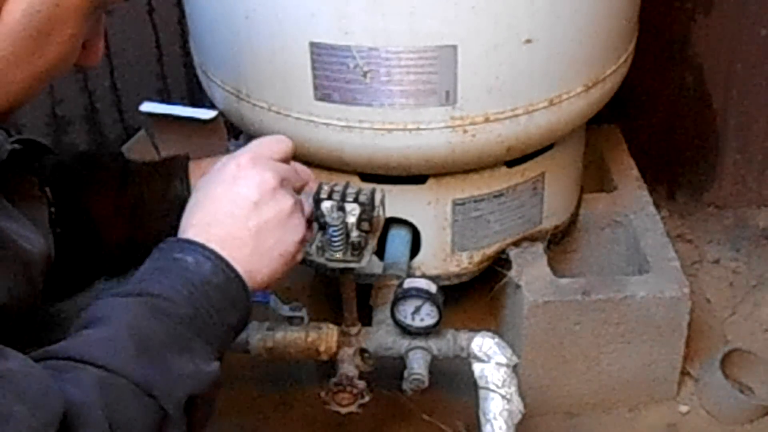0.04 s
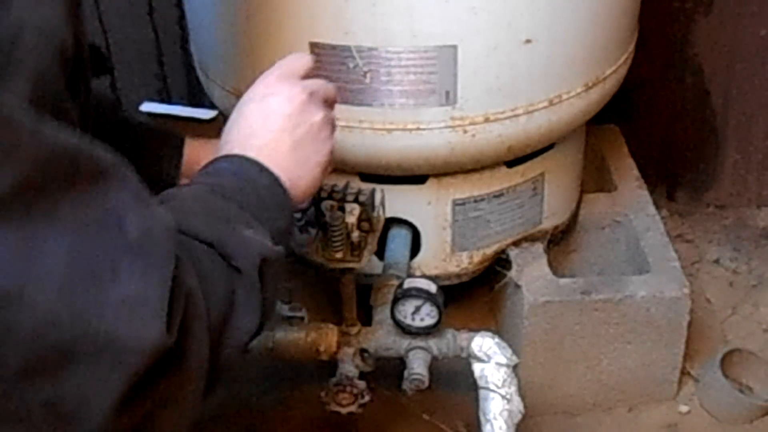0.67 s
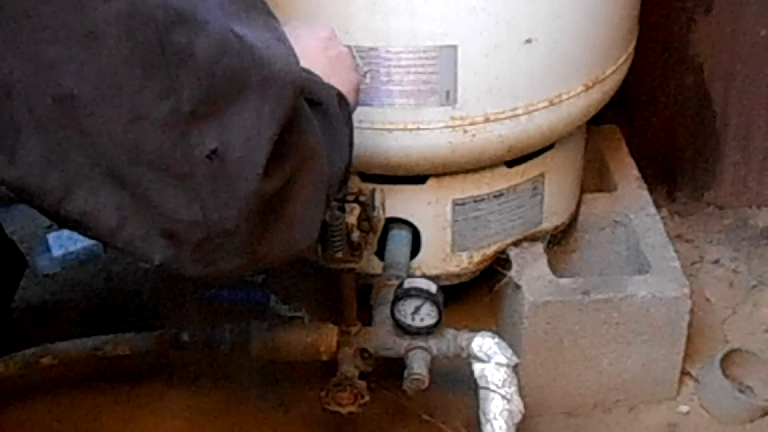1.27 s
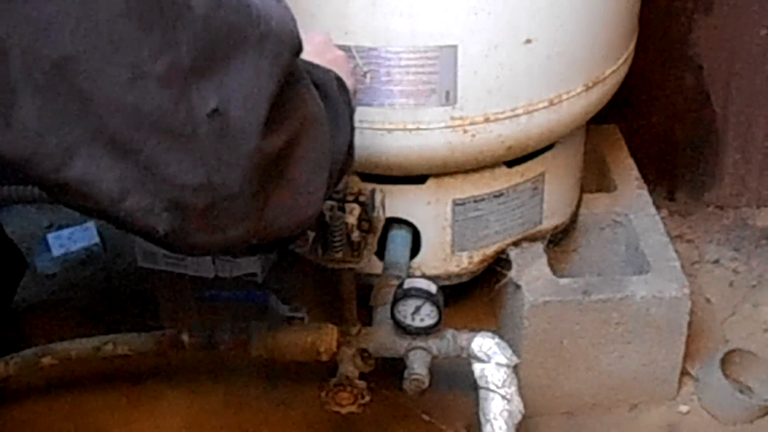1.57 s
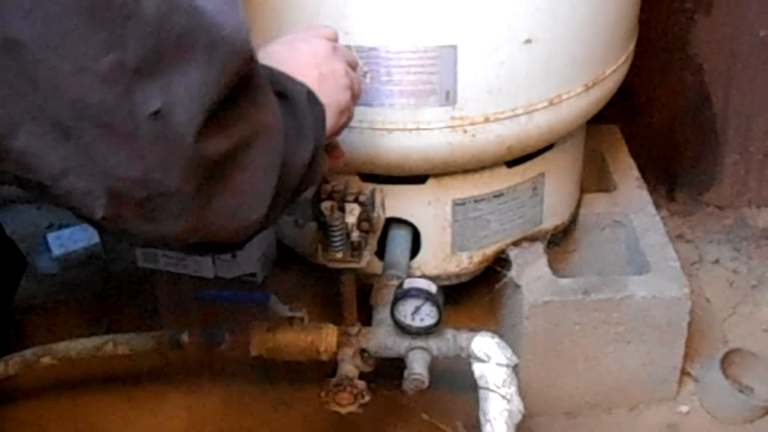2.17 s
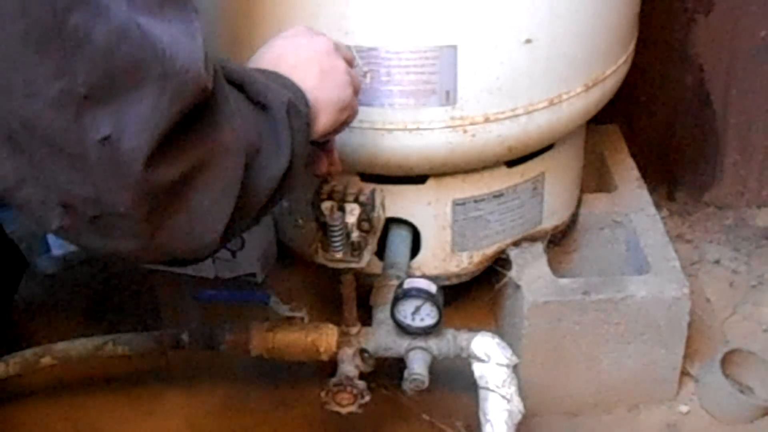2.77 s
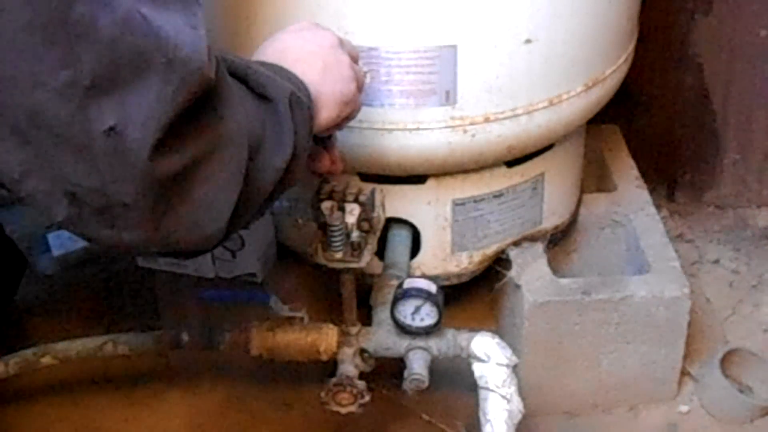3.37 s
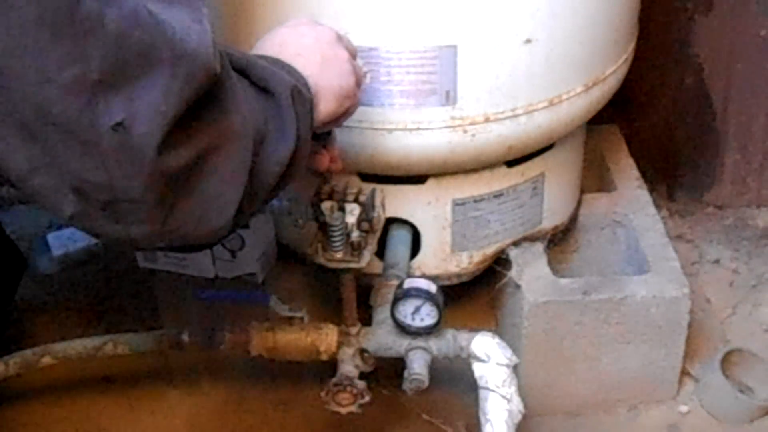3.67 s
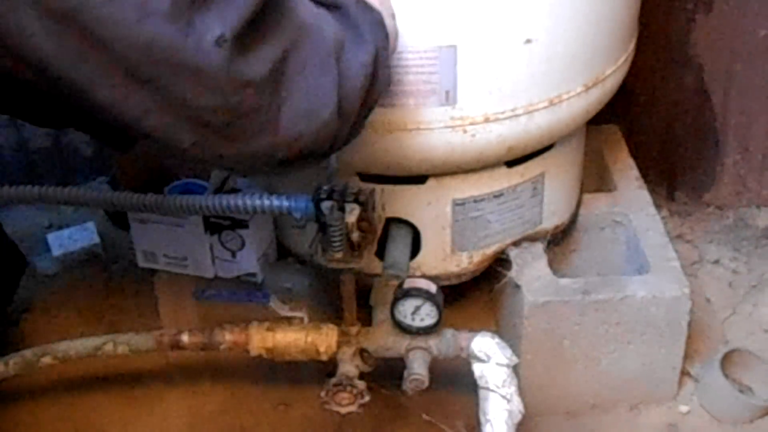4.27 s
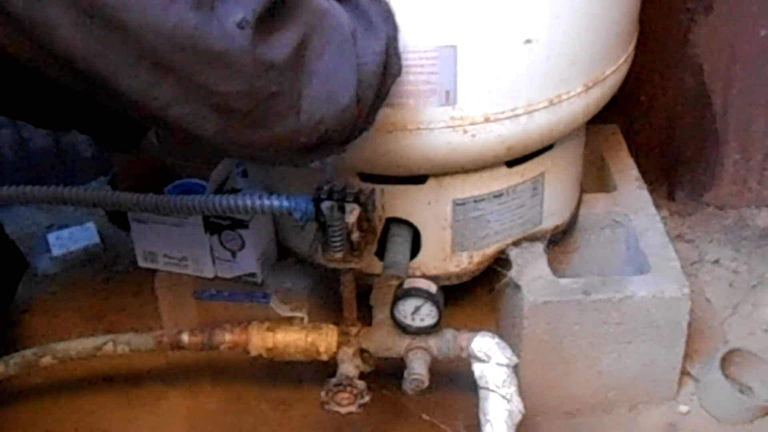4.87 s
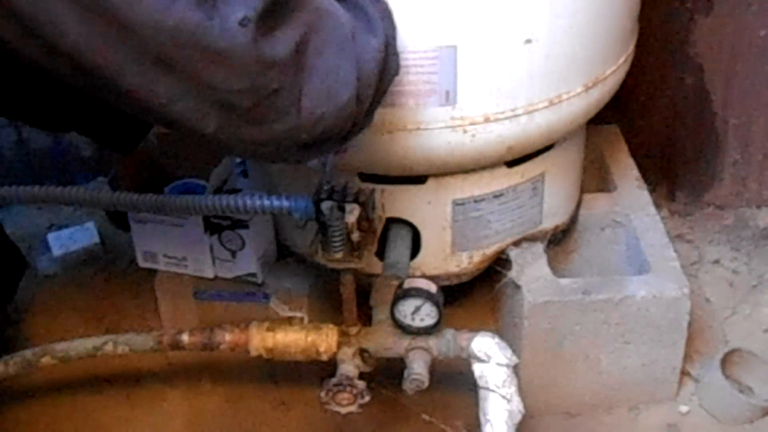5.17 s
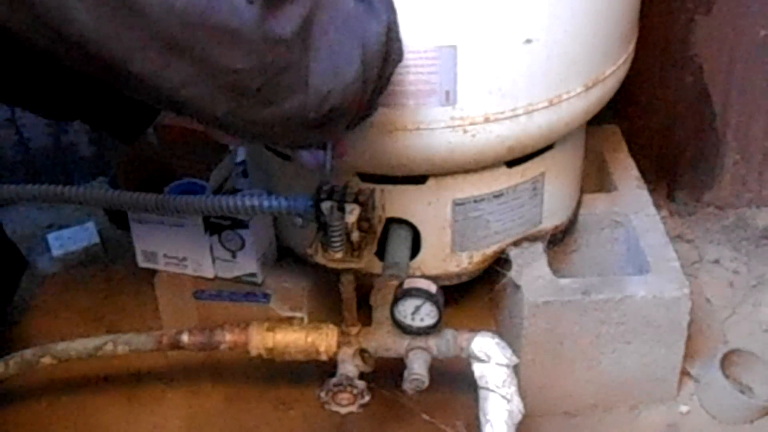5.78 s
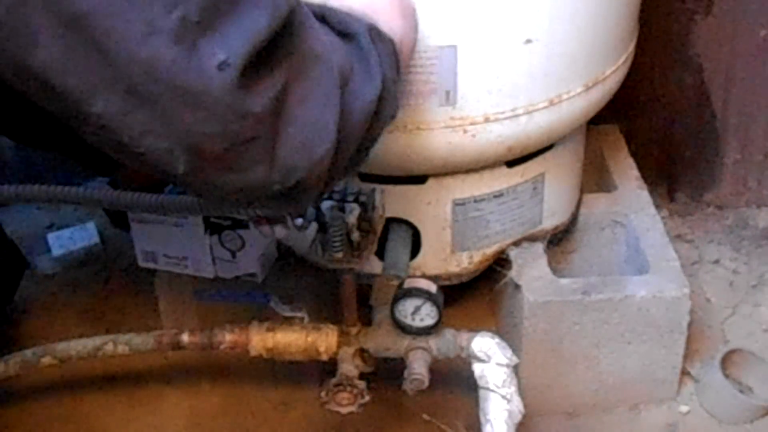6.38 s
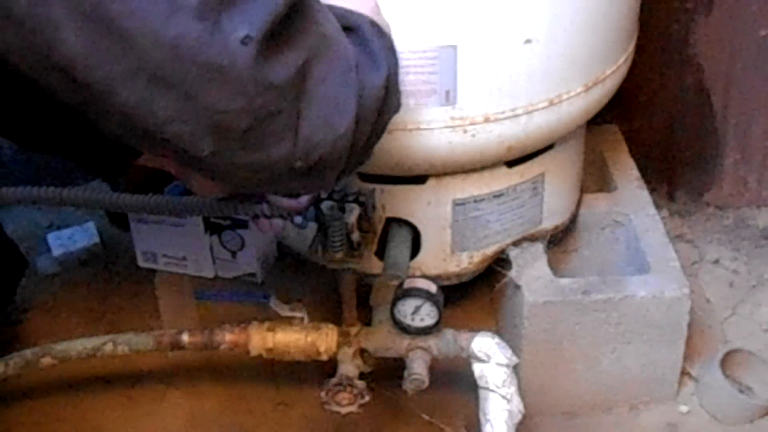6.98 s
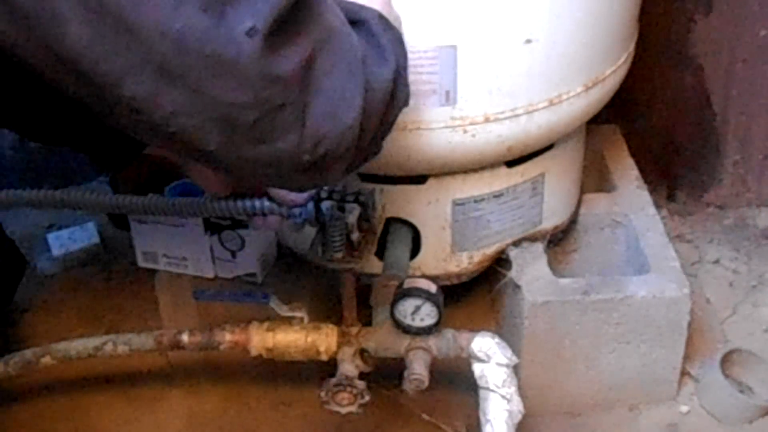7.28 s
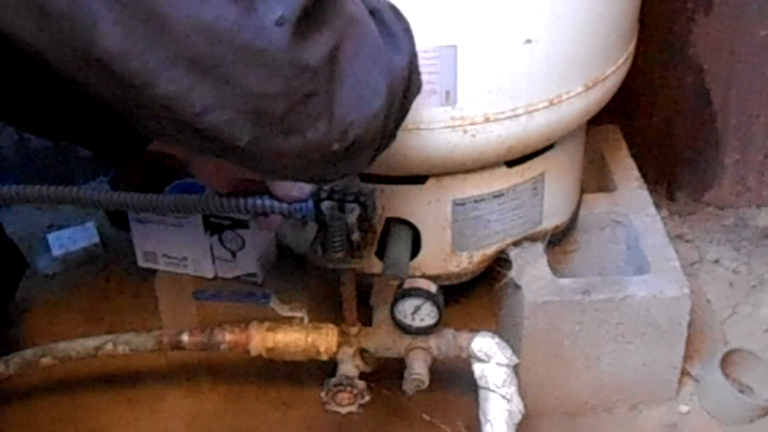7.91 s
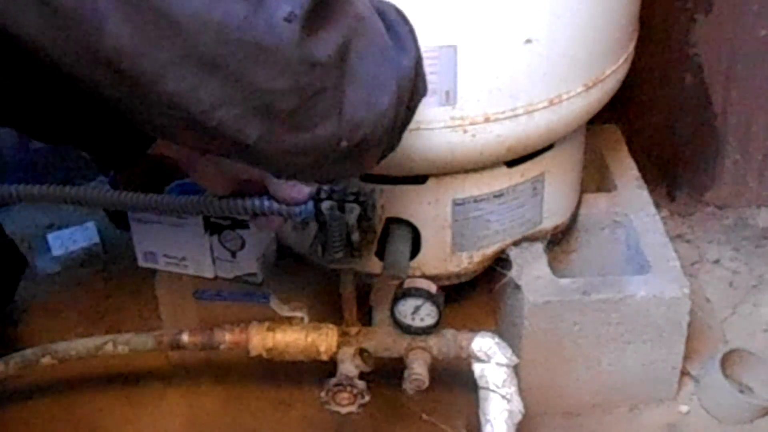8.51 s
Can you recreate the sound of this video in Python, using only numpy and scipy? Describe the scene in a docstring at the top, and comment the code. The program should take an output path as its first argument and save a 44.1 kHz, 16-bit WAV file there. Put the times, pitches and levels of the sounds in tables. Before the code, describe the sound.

A screwdriver and a stiff wire click and scrape in the switch of a well pump. Scattered taps give way to a quieter stretch of faint scraping, then a busier run of knocks and sharp metal clicks, some twanging a spring or booming faintly in the tank. A jacket sleeve rubs and swishes close to the microphone, over a faint hiss and low rumble in a small, hard-walled room.

```python
"""A screwdriver and a stiff wire click and scrape in the pressure switch of a well pump.
Each slip of the tool cracks and rings the steel, knocks the switch on its pipe and booms in the
pressure tank; some twang the switch spring. A small hard-walled room answers every hit.
A jacket sleeve rubs and swishes close to the microphone, over a faint hiss and a deep rumble."""
import sys
import numpy as np
from scipy import signal
from scipy.fft import rfft, irfft, next_fast_len
from scipy.io import wavfile

SR = 44100
rng = np.random.default_rng(int(sys.argv[2]) if len(sys.argv) > 2 else 0)


def materialize(psi):
    """Save the field psi as 16-bit PCM at rate SR to the path in sys.argv[1].

    A 1-D psi becomes a single channel; in a 2-D psi each row is a channel.
    """
    bounded = np.clip(np.atleast_2d(psi).T, -1, 1)
    quanta = np.round(bounded * 32767).astype(np.int16)
    wavfile.write(sys.argv[1], SR, quanta)


N = 381465
T = np.arange(2 * SR) / SR  # seconds since a hit
CLOCK = np.arange(N) / SR

# The tip clicks on the switch. Each row: start in seconds, force in dB, heft into the switch body in dB,
# bright edge in dB, blade ring in dB, contact time in seconds.
TAPS = [(0.2848, -25.5, 7, 6.5, -51, 0.0023), (0.3196, -30.5, 6, 18.5, -30.5, .0012),
        (0.4082, -43.5, 4, 20.5, -60, 0.0051), (0.475, -29.5, 8, -11, -48, 0.0058),
        (0.8638, -17, 8, -8, -50, 0.0035), (0.951, -19, 7.5, -5.5, -41, 0.0056),
        (0.997, -19.5, 9, -4.5, -48, 0.0059), (1.205, -28, 13.5, -12, -41, 0.0027),
        (1.357, -10.5, 8.5, 1.5, -29, 0.006), (1.6402, -20.5, -1.5, 3.5, -36.5, 0.0024),
        (4.2615, -16.5, 11, -7.5, -42, 0.0044), (4.4899, -26, 11.5, 1, -59, .005),
        (4.616, -32, 1, -7, -60, 0.0035), (4.926, -17.5, 6.5, 0, -47, 0.0034),
        (5.1542, -21.5, 5.5, -5.5, -54, 0.0023), (5.6601, -12, 12, 0, -32, .005),
        (5.805, -9, 4.5, -1, -41, 0.0045), (5.986, -35, 15.5, -3, -57, 0.0041),
        (6.5594, -21, 8.5, -7, -49, .006), (6.6547, -16, 12.5, -7.5, -26, 0.0066),
        (6.889, -13, 0.5, -11, -39, .005), (6.912, -16, 14, -1, -46, 0.0035),
        (6.9758, -12, -2.5, -8.5, -14.5, 0.0031), (7.159, -5.5, 7, 1.5, -44, 0.0044),
        (7.5299, -16, -11, -4, -34, 0.0098), (7.541, -23, 14.5, -1, -25.5, 0.0054),
        (7.9743, -6.5, 6.5, 4, -27, 0.0089), (8.3996, -15.5, 0, 1.5, -20, .004),
        (8.5421, -29, 13.5, 2.5, -41, 0.0074)]
# Centres of the thud, knock, clang, tick and fizz bands, in Hz.
BANDS = [180, 400, 1300, 3800, 8200]
# A tap's edge lifts the top end. Each row: frequency in Hz, share of the edge.
EDGE_SHARE = [(3800, 0.02), (6000, 0.42), (8200, 1.02), (12500, 1.04)]
# Blunt blows on the switch frame. Each row: start in seconds, force in dB, then shell clang and
# contact click in dB against that force.
KNOCKS = [(4.716, -4.5, -15, -30), (4.766, -8, -10.5, -30), (5.0104, 6, -5.5, -22), (5.309, 3, -4.5, -27),
          (6.765, -10, -15, -24.5)]
# Skids into some hard taps. Each row: landing time in seconds, skid level in dB, boom level in dB.
SKIDS = [(1.358, -15, -37), (5.662, -22, -30.5), (5.803, -20, -33), (7.159, -17, -32), (7.9737, -14, -33.5)]
# Spring twangs. Each row: start in seconds, level in dB, pitch factor set by where the tool holds it.
TWANGS = [(4.259, -32.5, 1.02), (4.4898, -36.5, 0.96), (4.9275, -28.5, 1.08), (5.1543, -33, 1),
          (5.804, -23.5, .597), (7.164, -16.5, 1), (7.978, -16, 0.99)]
# Wire and hand slide. Each row: cue in seconds, length in seconds, force in dB, brightness in dB.
SCRAPES = [(0.143, 0.027, -21, 18), (0.138, 0.17, -11.5, 0), (1.05, 0.15, -4, -19), (1.381, 0.037, 8, 3.5),
           (1.883, 0.065, -6, -5), (2.298, 0.1, -16, -13), (2.459, 0.033, -13.5, -8),
           (2.813, 0.057, -16, -7.5), (2.951, 0.068, -15, -10.5), (4.724, 0.11, -4.5, -14),
           (5.531, 0.071, -12.5, 3.5), (6.19, 0.055, -18.5, 8.5), (7.362, 0.064, -28.5, 11),
           (7.642, 0.018, -9, 9), (8.201, 0.055, -25.5, 19)]
# A stroke across the five bands: its usual gain in dB, and each band's share of its brightness.
STROKE_DB, BRIGHT_SHARE = [-10.5, -0.5, -13.5, -21, -25], [0.34, 0, 0.57, 0.98, 1]
# The sleeve's fader moves. Each row: time in seconds, rub in dB, swish in dB.
SLEEVE_MOVES = [(0.0, -37, -43.5), (0.46, -35.5, -38.5), (0.91, -29.5, -36), (1.03, -30, -35.5),
                (1.33, -31, -36.5), (1.49, -36.5, -43.5), (1.81, -35, -39.5), (2.46, -43, -50.5),
                (3.44, -50, -56.5), (4.04, -51, -55), (4.31, -45.5, -46), (4.43, -39.5, -46.5),
                (4.79, -38.5, -51), (4.94, -37, -40), (5.16, -30, -40), (5.49, -35.5, -43),
                (5.78, -36.5, -46.5), (6.02, -41.5, -50.5), (6.6, -43, -47.5), (6.79, -35, -47),
                (7.11, -38, -41), (7.32, -39.5, -46.5), (8.43, -40, -48), (8.65, -34.5, -43.5)]
# The microphone is jostled. Each row: peak time in seconds, length in seconds, level in dB.
BUMPS = [(0.27, .1, -27), (1.14, 0.17, -30), (2.233, 0.36, -32), (3.42, 0.12, -45), (3.712, 0.062, -34.5),
         (5.47, 0.14, -33), (6.93, .2, -38), (8.599, 0.14, -29)]

# The ringing metal. Each row: mode frequency in Hz, relative level in dB, seconds to fade by 60 dB.
BLADE_MODES = [(2830, -10, 0.15), (3430, -2, 0.087), (3430, -7, 0.13), (3480, -11, 0.041),
               (3670, -2.5, 0.061), (3720, 2, 0.14), (3550, 0.5, 0.14), (3880, -18, 0.12),
               (6200, -15, 0.13), (6360, -3, 0.051), (6660, -5, 0.11), (7280, -10, 0.17)]  # screwdriver blade
SWITCH_MODES = [(259.4, -9, 0.225), (336, -7.5, 0.22), (365.5, -2.5, 0.14), (386.2, 1, 0.18),
                (417, -1, 0.13), (449.4, 0.5, 0.1), (486, -9, 0.16), (554.7, -11.5, 0.21)]  # switch box on its pipe
PIPE_MODES = [(146, 0, 0.3), (215.1, 0.5, 0.59), (254, -3, 0.85), (273, -3, 0.65)]  # low pipework
SHELL_MODES = [(781, -4.5, 0.26), (884, -5, 0.2), (1007, 3.5, 0.28), (1060, -5, 0.16), (1283, 1, 0.24),
               (1332, 0, 0.21), (1448, -10, 0.17), (1660, -7, 0.19), (1712, -5, .2), (2190, -14, .24)]  # the tank's steel shell
TANK_MODES = [(78.8, -9.5, 2.24), (97, 1.5, 1.3), (165.4, -17.5, 2.9)]  # deep boom of the whole tank
SPRING_MODES = [(4360, -9, 0.23), (4470, -7, 0.12), (4660, -4, 0.076), (4830, -4, 0.16), (4870, 10, 0.029),
                (6100, -23, 0.16), (6500, -7, 0.14), (7340, -17, 0.22)]  # switch spring
ARM_MODES = [(10590, -3, .09), (10645, 0, .17), (10830, -7, .06), (11130, -4, .06), (11340, -6, .09),
             (11408, 0, .15)]  # thin contact arm in the switch

# Tone curves. Each row: frequency in Hz, gain in dB.
CONTACT_EQ = [(50, -24), (130, -7.5), (220, -4), (310, -9), (430, -6), (650, -4), (950, -8.5), (1400, -0.5),
              (1800, -2.5), (2900, -3.5), (4000, -2), (4900, -2.5), (8000, -2), (13000, -12.5)]  # a hit
SLIDE_EQ = [(50, -26.5), (145, 3), (260, -9.5), (400, -8.5), (600, -6.5), (950, -1.5), (1250, -6.5),
            (2300, -4.5), (4000, -1.5), (8000, 1.5), (13000, -10.5)]  # a sliding stroke
MIC_EQ = [(9900, 0), (10500, -3), (11050, -14.5), (11600, -4), (12200, -2.5), (13700, -7), (15000, -24),
          (15700, -15)]  # microphone, with a narrow port notch

# Noise colours. Each row: frequency in Hz, relative spectral level in dB.
SKID_NOISE = [(200, -38), (1000, -2), (3000, 9), (7000, 10), (10000, -2), (15000, -17)]  # bright friction of the tip
RUB_NOISE = [(55, -4), (95, 1.5), (160, 4.5), (290, -3), (400, 3), (650, 2), (900, -2), (1150, -7.5),
             (1400, -4.5), (1900, -12), (3000, -9.5), (6000, -51)]  # dull cloth
SWISH_NOISE = [(600, -34), (1300, -47), (1850, 0.5), (2250, 9.5), (2750, -11), (3400, 2.5), (4000, 1),
               (4500, 0), (7000, -0.5), (9500, -1.5), (13000, -11), (16000, -6)]  # airy cloth
BUMP_NOISE = [(10, -13), (20, 7), (32, -3), (55, -21), (90, -6.5), (130, -25), (300, -53), (1000, -90)]  # soft low thump
ROOM_TONE = [(58, 3), (85, 14), (130, -13), (170, 11.5), (290, -54), (390, 4.5), (490, -33), (600, 4),
             (850, -2), (1150, -7.5), (1900, -9), (2600, -28), (4200, -31), (10000, -24)]  # steady bed
WHISTLE_NOISE = [(1700, -40), (1960, -12), (2040, 7.5), (2150, 0), (2330, 1), (2480, -9), (2720, -27),
                 (2950, -9), (3400, -6), (4000, -48)]  # thin whistling hiss
RUMBLE_NOISE = [(3, -52), (8, -13), (13, -2), (18, 5), (24, -15), (34, -21), (48, -48), (70, -55),
                (150, -70)]  # sub-bass at the microphone

# The room's reverb. Each row: frequency in Hz, seconds to fade by 60 dB.
ROOM_DECAY = [(150, 0.56), (400, 0.32), (1300, 0.32), (4000, 0.27), (8000, 0.18), (14000, 0.17)]


def taps(snap_db=6.5, boom_db=-39, usual_contact_s=0.0041):
    """Each tap cracks and rings the blade; its heft pushes into the switch, the pipes and the tank."""
    out = np.zeros(N)
    for s, force, heft, edge, blade, contact_s in TAPS:
        tail = room_tail()
        push = force + heft
        thud = push - 5.5
        clang = (push + force) / 2 - 7.5
        body = list(zip(BANDS, (thud, push, clang, force, force)))
        treble = [(hz, share * edge) for hz, share in EDGE_SHARE]
        snap = snap_db + 19.5 * np.log10(usual_contact_s / contact_s)  # briefer contacts snap harder
        add(out, s, colour(crack(tail, snap, contact_s), body, treble, CONTACT_EQ, spot_colour()))
        add(out, s, pump_body(tail, thud, push, clang))
        add(out, s, amp(blade - 4) * ring(BLADE_MODES, tail, rise_s=0.00044, wet_db=-9.5))
        add(out, s + 0.004, amp(push + boom_db) * ring(TANK_MODES, tail, rise_s=0.0083, wet_db=-13))
    return out


def crack(tail, snap_db, contact_s=0.0037, build_s=0.0038, bite_s=0.0012):
    """The attack: a few milliseconds of chattering metal, then the room's answer."""
    t = T[:len(tail)]
    envelope = np.exp(-t / contact_s) * (1 - 0.43 * np.exp(-t / bite_s))
    chatter = amp(snap_db + 4) * rng.standard_normal(len(t)) * envelope
    reflections = tail * (1 - np.exp(-t / build_s))
    return level_attack(chatter + reflections)


def spot_colour(ripple_db=3, count=56):
    """A fresh tone curve per hit: each spot the tip meets favours other well-damped resonances."""
    hz = np.linspace(1500, 16000, count)
    return np.column_stack([hz, ripple_db * rng.standard_normal(count) * (hz > hz[0])])


def pump_body(tail, thud_db, knock_db, clang_db):
    """A blow rings the pipes, the switch and the tank's shell; heavy parts speak more slowly."""
    out = np.zeros(len(T))
    add(out, 0.00418, amp(thud_db - 25) * ring(PIPE_MODES, tail, rise_s=0.0097, wet_db=-11.5))
    add(out, 0.00404, amp(knock_db - 19) * ring(SWITCH_MODES, tail, rise_s=0.022, wet_db=-4))
    add(out, 0.00096, amp(clang_db - 19.5) * ring(SHELL_MODES, tail, rise_s=0.0039, wet_db=-8.5))
    return out


def ring(modes, tail, rise_s, wet_db, spread_db=1.5):
    """Struck metal rings out into the room, its modes balanced a little differently each time."""
    t = T[:int(max(t60 for _, _, t60 in modes) * SR)]
    offsets_db = spread_db * rng.standard_normal(len(modes))
    phases = rng.random(len(modes))
    metal = sum(amp(db + offset - 60 * t / t60) * np.sin(2 * np.pi * (hz * t + phase))
                for (hz, db, t60), offset, phase in zip(modes, offsets_db, phases))
    metal *= 1 - np.exp(-t / rise_s)
    return level_attack(metal + amp(wet_db) * reverb(metal, tail))


def knocks(snap_db=2, muffle_db=8, hollow_db=3):
    """A blunt blow chatters less than a tap and rings the tank's shell more."""
    out = np.zeros(N)
    for s, force, shell, click in KNOCKS:
        tail = room_tail()
        thud, clang, tick = force - 15, force + shell, force + click
        fizz = tick - 3.5
        body = list(zip(BANDS, (thud, force - muffle_db, clang - muffle_db, tick, fizz)))
        add(out, s, colour(crack(tail, snap_db), body, CONTACT_EQ, spot_colour()))
        add(out, s, pump_body(tail, thud, force, clang + hollow_db))
    return out


def skids(swell_s=0.0047):
    """Friction swells into the hit as the tip loses its grip."""
    envelope = np.zeros(N)
    lead_s = 4 * swell_s
    for s, db, _ in SKIDS:
        add(envelope, s - lead_s, amp(db) * np.exp(T[:int(lead_s * SR)] / swell_s - 4))
    return envelope * noise(SKID_NOISE)


def booms(nudge_s=0.138, nudge_db=-33):
    """The tank booms at a first nudge of the hand; tank and pipes boom whenever a skid lands."""
    out = np.zeros(N)
    add(out, nudge_s, amp(nudge_db) * ring(TANK_MODES, room_tail(), rise_s=0.022, wet_db=-12))
    for s, _, db in SKIDS:
        tail = room_tail()
        add(out, s + 0.0029, amp(db) * ring(TANK_MODES, tail, rise_s=0.023, wet_db=-9.5))
        add(out, s + 0.00476, amp(db) * ring(PIPE_MODES, tail, rise_s=0.011, wet_db=-12))
    return out


def twangs(arm_s=7.967, arm_db=-8):
    """The spring sings on when the tool slips off it; one hard skid also sets a contact arm squealing."""
    out = np.zeros(N)
    for s, db, pitch in TWANGS:
        modes = [(hz * pitch, level, t60) for hz, level, t60 in SPRING_MODES]
        add(out, s, amp(db) * ring(modes, room_tail(), rise_s=0.00045, wet_db=-6))
    add(out, arm_s, amp(arm_db) * ring(ARM_MODES, room_tail(), rise_s=0.0011, wet_db=-5))
    return out


def scrapes(slips_per_s=1500, gain_db=4, lead_s=0.015):
    """A stroke of wire or hand is a swelling run of tiny slips, smeared by the room."""
    out = np.zeros(N)
    for s, length, force, bright in SCRAPES:
        tail = room_tail()
        t = T[:len(tail)]
        slips = rng.standard_normal(len(t)) * np.sqrt(SR / slips_per_s)
        slips *= rng.random(len(t)) < slips_per_s / SR
        swell = np.sin(np.pi * np.minimum(t / length, 1)) ** 2
        stroke = reverb(slips * swell, tail)
        tone = [(hz, db + share * bright) for hz, db, share in zip(BANDS, STROKE_DB, BRIGHT_SHARE)]
        add(out, s - lead_s, amp(force + gain_db) * colour(stroke, tone, SLIDE_EQ))
    return out


def sleeve(grain_db=3, rub_gain_db=-0.5, swish_gain_db=1.5):
    """Cloth rubs with a dull, lumpy sound and swishes in fine grains."""
    s, rub_db, swish_db = np.transpose(SLEEVE_MOVES)
    folds = flutter(per_s=55, depth_db=0.28)
    grains = amp(grain_db * np.minimum(rng.exponential(1, N), 5))
    lumps = flutter(per_s=70, depth_db=1.5)
    rub = amp(np.interp(CLOCK, s, rub_db) + rub_gain_db) * noise(RUB_NOISE, lumps)
    swish = amp(np.interp(CLOCK, s, swish_db) + swish_gain_db) * noise(SWISH_NOISE, grains)
    return folds * (rub + swish)


def background(room_db=-48.5, whistle_db=-53, rumble_gain_db=-15, rumble_follow=0.46):
    """The bed: room tone, a whistling hiss, a rumble that grows as the sleeve moves, and soft bumps."""
    s, rub_db, _ = np.transpose(SLEEVE_MOVES)
    rumble = amp(rumble_gain_db + rumble_follow * np.interp(CLOCK, s, rub_db)) * noise(RUMBLE_NOISE)
    steady = amp(room_db) * noise(ROOM_TONE) + amp(whistle_db) * noise(WHISTLE_NOISE)
    jostle = sum(amp(db) * np.exp(-(2 * (CLOCK - s) / length) ** 2) for s, length, db in BUMPS)
    return steady + rumble + jostle * noise(BUMP_NOISE)


def room_tail(size=24000):
    """Dense reflections off the hard walls; the treble dies first."""
    hz, t, spectrum = signal.stft(rng.standard_normal(size), SR, nperseg=256)
    decay = amp(-60 * t / curve(ROOM_DECAY, hz)[:, None])
    _, tail = signal.istft(spectrum * decay, SR, nperseg=256)
    return level_attack(tail[:size])


def reverb(x, tail):
    """The fully wet sound, through a tail of unit energy."""
    return signal.fftconvolve(x, tail / np.linalg.norm(tail))[:len(x)]


def amp(db):
    """Decibels to gain."""
    return 10 ** (np.asarray(db) / 20)


def curve(points, hz):
    """Joins breakpoints with straight lines on a log-frequency axis."""
    f, value = np.transpose(points)
    return np.interp(np.log(hz + 1), np.log(f + 1), value)


def add(mix, s, sound):
    """Drops a sound into the mix at s seconds."""
    part = mix[max(round(s * SR), 0):][:len(sound)]
    part += sound[:len(part)]


def level_attack(x):
    """Scales a sound to rms 1 over its first 40 ms."""
    return x / np.sqrt(np.mean(x[:int(.04 * SR)] ** 2) + 1e-20)


def colour(x, *curves, size=2048):
    """Stacks dB tone curves into one minimum-phase EQ, so nothing rings ahead of a hit."""
    hz = np.fft.rfftfreq(size, 1 / SR)
    gain = amp(sum(curve(points, hz) for points in curves))
    cepstrum = irfft(np.log(gain))
    cepstrum[1:size // 2] *= 2
    cepstrum[size // 2 + 1:] = 0
    impulse = irfft(np.exp(rfft(cepstrum)))
    return signal.oaconvolve(x, impulse)[:len(x)]


def noise(spectrum, drive=1):
    """Noise of rms 1 with the given spectrum; drive roughens it before it is coloured."""
    size = next_fast_len(N)
    gain = amp(curve(spectrum, np.fft.rfftfreq(size, 1 / SR)))
    x = irfft(rfft(drive * rng.standard_normal(N), size) * gain, size)[:N]
    return x / x.std()


def flutter(per_s, depth_db):
    """A gain that wanders at random."""
    knots = rng.standard_normal(N // 20)
    return amp(depth_db * np.interp(CLOCK * per_s, np.arange(len(knots)), knots))


def scene():
    """Tool, wire, sleeve and room in one mono mix."""
    return (taps() + knocks() + skids() + booms() + twangs() + scrapes() + sleeve() + background())[None]


def record(dry, threshold_db=-17, squeeze=0.49, recovery_db_per_s=22, cutoff_hz=15750):
    """Microphone colour, gain control that ducks after loud taps, hard clipping and a low-pass."""
    x = colour(dry[0], MIC_EQ)
    power_db = 10 * np.log10(signal.lfilter([1 / 500], [1, 1 / 500 - 1], x ** 2) + 1e-12)
    fall = CLOCK * recovery_db_per_s
    held_db = np.maximum.accumulate(power_db + fall) - fall  # catches each peak, then sinks
    over_db = np.maximum(held_db - threshold_db, 0)
    duck_db = signal.lfilter([1 / 600], [1, 1 / 600 - 1], squeeze * over_db)  # eases in over 14 ms
    x = np.clip(x * amp(-duck_db), -1, 1)
    lowpass = signal.firwin(511, cutoff_hz, window=("kaiser", 9), fs=SR)
    return signal.oaconvolve(x, lowpass, "same")[None]


dry = scene()
out = record(dry)
materialize(out)
```